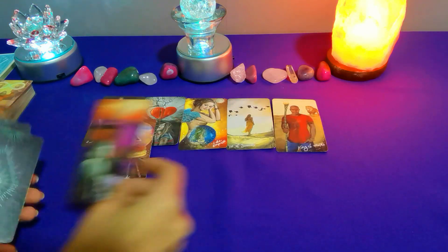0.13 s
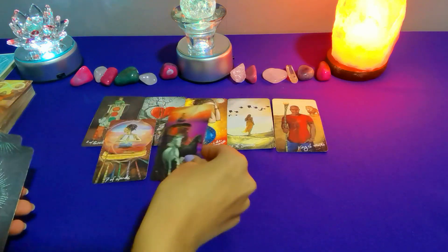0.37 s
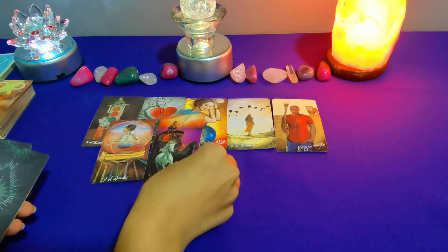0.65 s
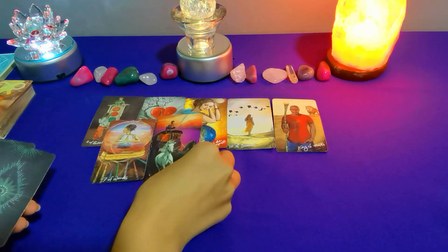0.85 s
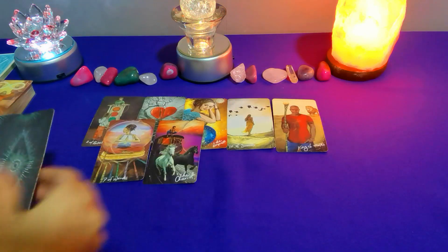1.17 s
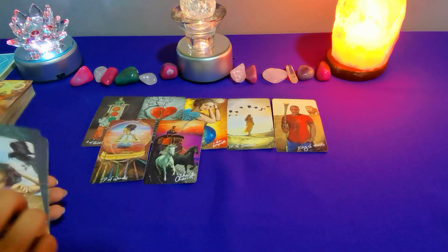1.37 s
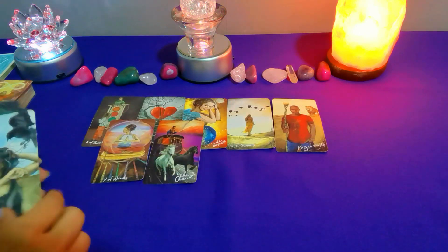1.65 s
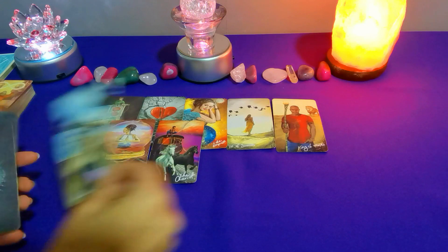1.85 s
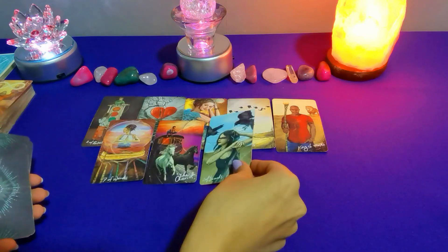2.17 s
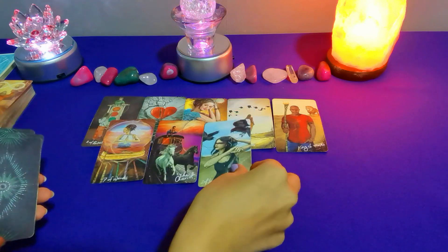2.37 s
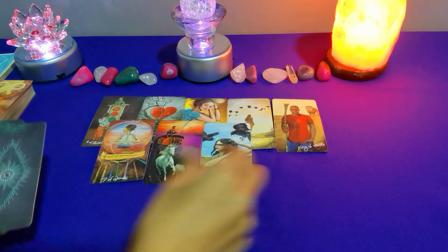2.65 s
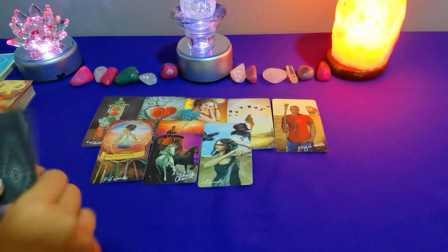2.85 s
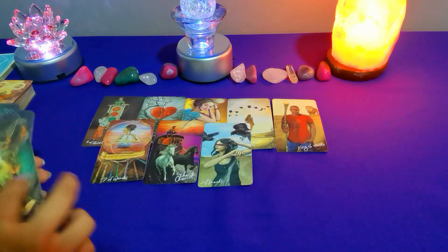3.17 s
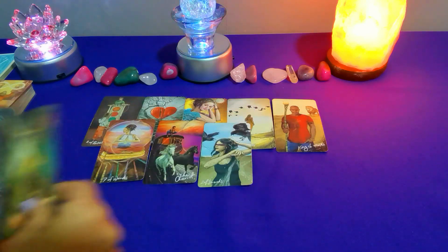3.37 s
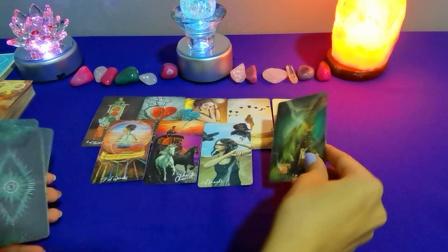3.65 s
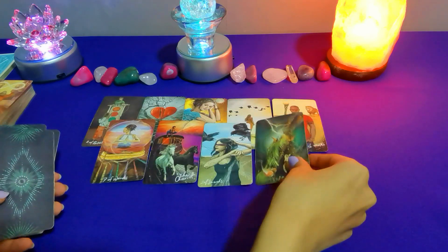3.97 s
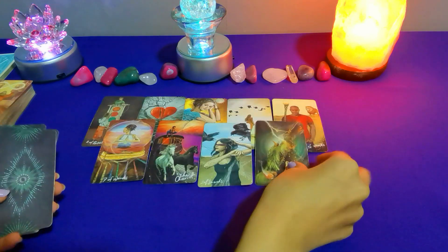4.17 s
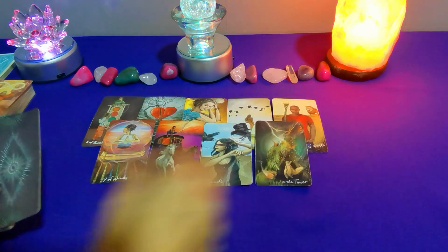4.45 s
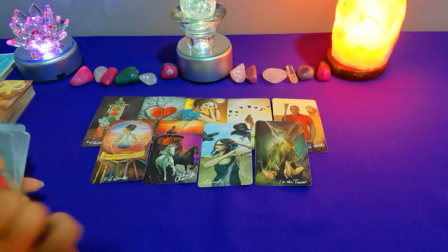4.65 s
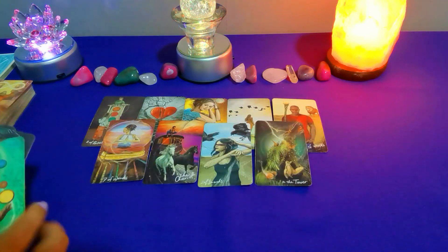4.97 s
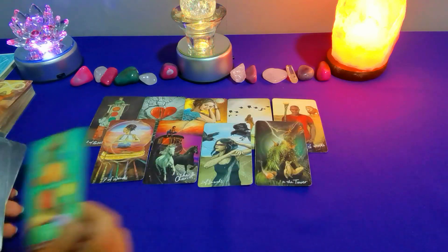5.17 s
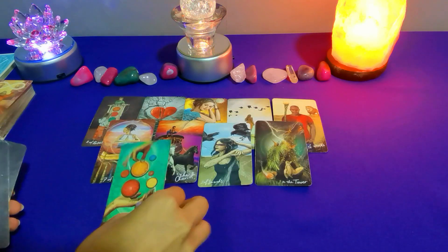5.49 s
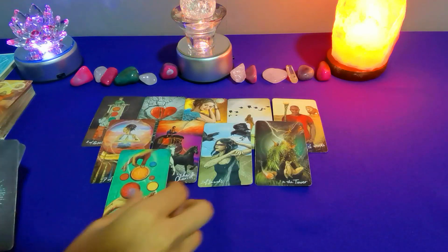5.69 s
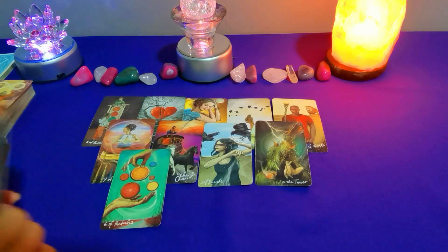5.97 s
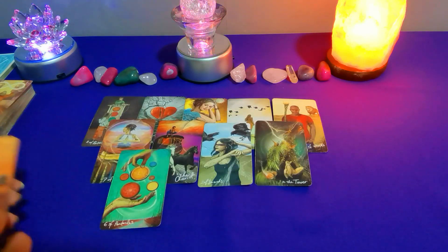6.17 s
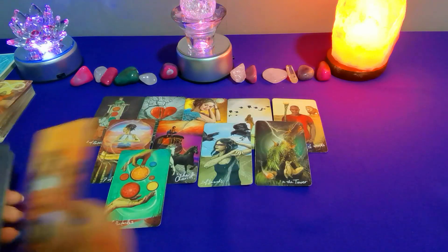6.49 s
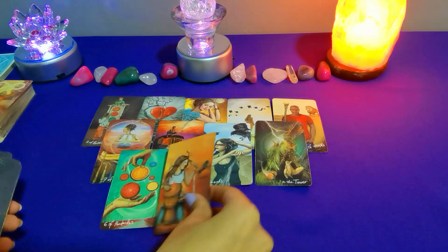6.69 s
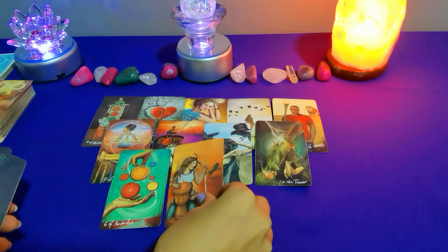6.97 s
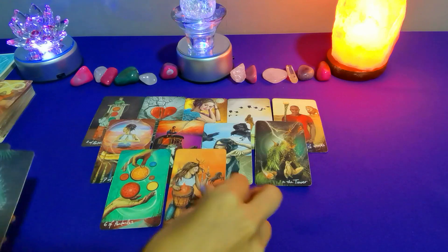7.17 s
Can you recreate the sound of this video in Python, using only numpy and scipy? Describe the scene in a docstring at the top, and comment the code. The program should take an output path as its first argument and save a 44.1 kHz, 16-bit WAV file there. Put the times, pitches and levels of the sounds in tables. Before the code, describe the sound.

Close handling of stiff cards in a small, quiet room with low house rumble and faint hiss. A card slides off the deck immediately with a thin swish and small clicks, lands with a faint scrape near 0.45 s, and soft dull knuckle bumps follow at 0.7-0.95 s. Cloth brushes, then sharp snaps and scuffs crackle from 1.2 to 1.5 s; the next card swishes free near 1.8 s and is laid quietly around 2.5 s. More flicks at 2.9-3.1 s, a swish at 3.35 s, a soft thud at 3.46 s, and a tick and scrape near 4.05 s. Rasping snaps at 4.6-4.8 s lead to a draw at 5.1 s and a strong snap at 5.56 s. A flurry at 5.9-6.2 s precedes the last swish at 6.4 s, a clearer scrape at 7.07 s and a final cloth brush. The treble is bright and ringing; the hardest snaps distort slightly.

```python
"""Large stiff cards are dealt one by one onto a cloth-covered table, close to a phone in a small quiet room.
For each card a thumb scuffs the deck and edges flick free, the card is drawn out with a swish, laid and pressed
down, and the hand brushes back over the cloth. Friction sounds are shaped noise, snaps are short noise bursts,
bumps are decaying table modes. The microphone rings in the treble and overloads on the hardest snaps."""
import sys
import numpy as np
from scipy import signal
from scipy.fft import rfft, irfft
from scipy.io import wavfile
from scipy.ndimage import uniform_filter1d

SR = 44100
rng = np.random.default_rng(int(sys.argv[2]) if len(sys.argv) > 2 else 0)


def transcribe(signal):
    """Save signal, clipped to [-1, 1], as a 16-bit WAV file at the path in sys.argv[1]."""
    frames = np.atleast_2d(signal).T
    limited = np.clip(frames, -1, 1)
    pcm = np.round(limited * 32767).astype(np.int16)
    wavfile.write(sys.argv[1], SR, pcm)


N = 323253
TIME = np.arange(N) / SR

# Bending resonances of a held card. Each row: centre in Hz, width in Hz, height over the broad spectrum in dB.
CARD_RINGS = [(560, 143, 8), (1116, 230, 4.5), (1370, 91, 2.5), (2010, 380, 4.5), (3150, 630, 2),
              (5730, 96, 3.5)]


def undb(db):
    """Decibels to gain."""
    return 10 ** (np.asarray(db) / 20)


def spectrum_db(points, hz):
    """Join (Hz, dB) points on a log-frequency axis."""
    point_hz, point_db = np.transpose(points)
    return np.interp(np.log(hz), np.log(point_hz), point_db)


def colour(x, points, rings=(), size=2048):
    """Minimum-phase filter of unit power gain with a broad spectrum and resonant humps."""
    hz = np.maximum(np.arange(size // 2 + 1) * SR / size, 1)
    db = spectrum_db(points, hz)
    for centre_hz, width_hz, hump_db in rings:
        db = db + hump_db / (1 + (2 * (hz - centre_hz) / width_hz) ** 2)
    # folding the cepstrum makes the response causal
    cepstrum = irfft(np.log(undb(db)))
    cepstrum[1:size // 2] *= 2
    cepstrum[size // 2 + 1:] = 0
    response = irfft(np.exp(rfft(cepstrum)))
    response /= np.linalg.norm(response)
    return signal.oaconvolve(x, response[None], axes=-1)[:, :N]


def walk(rate_hz):
    """Straight lines between Gaussian knots, rate_hz knots a second."""
    knots = rng.standard_normal(N)
    return np.interp(TIME * rate_hz, np.arange(N), knots)


def pan(db):
    """Left and right gains for a level difference; positive is left."""
    return undb(np.array([[db], [-db]]) / 2)


def noise(shared=0.22, lag_samples=9):
    """Noise at two microphone ports; the shared part reaches the left one first."""
    common = rng.standard_normal(N)
    both = np.array([common, np.roll(common, lag_samples)])
    return np.sqrt(shared) * both + np.sqrt(1 - shared) * rng.standard_normal((2, N))


def friction(grain_db, grain_hz, patchy_db, patch_hz, lag_samples=9):
    """Dense micro-slips: noise in tiny grains of uneven size that come in patches."""
    grip = undb(grain_db * walk(grain_hz) + patchy_db * walk(patch_hz))
    grip /= np.sqrt(np.mean(grip ** 2))
    return noise(lag_samples=lag_samples) * grip


def stroke(times_s, db):
    """Gain of one movement, silent before and after."""
    level_db = np.interp(TIME, times_s, db, left=-np.inf, right=-np.inf)
    return uniform_filter1d(undb(level_db), size=200)


def swell(s, db, rise_s, fall_s, hold_s=0):
    """Gain of a push that builds up exponentially to a moment, may be held, and dies away."""
    distance = np.maximum((s - TIME) / rise_s, (TIME - s - hold_s) / fall_s)
    return undb(db) * np.exp(-distance.clip(0, 20))


def around(s, half_s=.2):
    """The samples near a moment."""
    return slice(int((s - half_s) * SR), int((s + half_s) * SR))


def add(track, s, sound):
    """Mix a short stereo sound into a track."""
    start = int(np.clip(s * SR, 0, N - 1))
    track[:, start:start + sound.shape[-1]] += sound[..., :N - start]


def flexed(x, hump_db=5, width_share=0.32, count=5):
    """Every grip bends the card differently and gives it a few broad passing resonances."""
    notes_hz = 800 * 10 ** ((np.arange(count) + rng.random(count)) / count)  # one per slot, 800-8000 Hz
    rings = [(hz, width_share * hz, hump_db) for hz in notes_hz]
    return colour(x, [(1000, 0)], rings, size=1024)


def draws(edge_db=-2, body_db=-13, pan_db=4, note_width_hz=350, note_db=8):
    """A card slides off the deck: a thin hiss first, then the freed face radiates lower notes."""
    # Each row: start of creep in s, fastest pull in s, coming free in s, relative level in dB,
    # body on coming free in dB, note of the bent card in Hz.
    draw_rows = [(0, 0.064, 0.1, -33, 14, 1880), (1.66, 1.79, 1.855, -32.5, 7.5, 2820),
                 (3.257, 3.339, 3.384, -29.5, -0.5, 2300), (5.044, 5.081, 5.136, -26.5, 3, 1480),
                 (6.352, 6.425, 6.466, -30, 1.5, 2760)]
    # Spectra of hiss and face. Each row: frequency in Hz, relative level in dB.
    hiss_points = [(1000, -24), (2800, -13), (3900, -3), (6000, 2.5), (9000, 3), (14000, -2.5)]
    face_points = [(850, -11), (1450, 10), (2000, 12), (4200, 2.5), (8000, -5.5)]
    speed_up_s, release_s = 0.034, 0.035
    creep_db, slowing_db, touch_db = -13.5, -5, -22  # under the pull: slow start, coming free, first and last touch
    held_body_db = -23.5  # lower notes while the deck still holds the card

    slide = friction(grain_db=2.5, grain_hz=2000, patchy_db=3, patch_hz=170)
    edge, face = 0, 0
    for creep_s, pull_s, free_s, db, free_db, hz in draw_rows:
        times_s = [creep_s - release_s, creep_s, pull_s - speed_up_s, pull_s, free_s, free_s + release_s]
        course_db = np.array([touch_db, creep_db, creep_db, 0, slowing_db, touch_db])
        rub = slide * stroke(np.sort(times_s), db + course_db)
        freed = undb(np.interp(TIME, [pull_s, free_s], [held_body_db, free_db]))
        edge = edge + rub
        face = face + colour(rub * freed, face_points, [(hz, note_width_hz, note_db)])
    hiss = colour(edge, hiss_points, CARD_RINGS)
    return pan(pan_db) * (undb(edge_db) * hiss + undb(body_db) * face)


def brush(gain_db=-4, pan_db=4.0, attack_s=0.056, release_s=0.047, sleeve_db=-58):
    """Fine fibres under the moving hand and sleeve make a smooth, high hiss."""
    # Each row: time up to speed in s, time held in s, relative level in dB.
    stroke_rows = [(.42, 0.045, -47), (1.031, 0.081, -36.5), (1.19, 0.29, -40.5), (2.22, 0.16, -53.5),
                   (2.61, .5, -39), (3.45, 0.058, -45.5), (3.6, 0.11, -52), (3.98, 0.016, -52),
                   (4.14, 0.028, -42), (4.43, 0.41, -37.5), (5.36, 0.048, -42), (5.67, 0.54, -43.5),
                   (7.14, .01, -40), (7.3, .05, -31)]
    # Spectrum of rubbed cloth. Each row: frequency in Hz, relative level in dB.
    cloth_points = [(1200, -12), (3500, -12.5), (7300, 1.5), (10000, 4), (13000, -3)]
    strokes = [swell(s, db, attack_s, release_s, hold_s) for s, hold_s, db in stroke_rows]
    speed = np.maximum(np.max(strokes, axis=0), undb(sleeve_db))  # the arm is never quite still
    rub = speed * friction(grain_db=1.5, grain_hz=2500, patchy_db=1.5, patch_hz=46)
    return undb(gain_db) * pan(pan_db) * colour(rub, cloth_points)


def air(level_db=-52, waver_db=0.07):
    """Low steady rumble of the house and a faint hiss: coloured noise, barely wavering."""
    # Each row: frequency in Hz, relative level in dB.
    air_points = [(30, -30.5), (90, 4), (150, 3.5), (270, -1), (900, -19.5), (2200, -17.5), (4000, -21),
                  (6000, -17), (9000, -33.5), (15000, -18)]
    level = undb(level_db + waver_db * walk(5.22))
    return level * colour(noise(0.2, lag_samples=0), air_points)


def snaps(fall_s=0.00064, ring_s=0.0048, ring_db=-17, edge_db=-5, body_db=-17, pan_db=5, body_pan_db=2,
          mean_rebound_s=.008, rebound_db=-16):
    """An edge slips ever harder, lets go, and the stiff card flutters out in milliseconds and rebounds once."""
    # Card edges slapping their neighbours. Each row: release in s, relative level in dB, body over edge in dB,
    # swell time constant in s.
    snap_rows = [(.0454, -23.5, -6, 0.00098), (.1142, -17.5, -7, 0.0016), (.9376, -18.5, -6, 0.00061),
                 (.9574, -18, -21, 0.00062), (1.2467, -17.5, 6.5, 0.00087), (1.2977, -16, 13.5, 0.0017),
                 (1.3705, -9, 9, 0.0007), (1.4221, -0.5, -2, 0.00037), (1.4327, -15.5, 0, 0.0017),
                 (1.4756, -5, -4, 0.0016), (1.6197, -35, 3, 0.00051), (1.8215, -12, -12, 0.0011),
                 (1.8373, -15, -14, 0.0041), (1.9733, -30, -5, 0.00079), (2.128, -38, 3, .001),
                 (2.36, -37, 9, .0006), (2.4916, -28.5, -11, .0004), (2.8699, -17, 1, 0.00032),
                 (2.888, -17.5, -14, .0006), (2.9145, -10, 5.5, 0.00056), (3.0033, -8.5, 1, 0.00055),
                 (3.0411, -13, 0.5, 0.0004), (3.053, -12, 2, 0.00058), (3.0767, -2, -19, 0.0034),
                 (3.0848, -7, -3, 0.00021), (4.0524, -23, -13, .0015), (4.5813, -17.5, -1, 0.00084),
                 (4.599, -20.5, 4, 0.00068), (4.7189, -9.5, -2, 0.00057), (4.7742, -2.5, -4, 0.00068),
                 (4.8195, -4.5, -33, 0.0016), (5.134, -23, 7.5, .0015), (5.5126, -30, 17, 0.0014),
                 (5.5641, -2, -6, 0.0016), (5.8964, -22, 1.5, 0.0007), (5.9465, -29, 15, 0.0005),
                 (5.9996, -7.5, 7, 0.001), (6.0698, -10.5, 5, 0.00043), (6.0777, -18, 8, 0.0006),
                 (6.1214, -4, -3.5, 0.0011), (6.1628, -6, 3, 0.0011), (6.358, -22.5, -6, 0.00055),
                 (7.0712, -14.5, -7, 0.00042)]
    # Spectra of edge and body. Each row: frequency in Hz, relative level in dB.
    edge_points = [(1500, -22), (3200, -4), (6000, 3), (14000, 2.5)]
    body_points = [(80, -21), (280, 1), (800, -6), (2200, 1.5), (3500, 0.5), (8000, -6.5)]

    edge, body = np.zeros((2, 2, N))
    lead_s = .012
    t = np.arange(int(3 * lead_s * SR)) / SR - lead_s
    after = np.maximum(t, 0)
    flutter = np.exp(-after / fall_s) + undb(ring_db) * np.exp(-after / ring_s)
    slips = np.sign(noise(.6))  # equal force before shaping, only the direction is chance
    for k, (s, db, low_db, swell_s) in enumerate(snap_rows):
        shape = np.exp(np.minimum(t, 0) / max(swell_s, 1e-4)) * flutter
        shape /= np.sqrt(np.sum(shape ** 2) / SR / (2 * fall_s))  # same energy for every swell
        burst = shape * slips[:, k * len(t):(k + 1) * len(t)]
        flick = undb(db) * flexed(burst)
        rebound_s = mean_rebound_s * (.5 + rng.random())
        for late_s, sound in (0, flick), (rebound_s, undb(rebound_db) * flick):
            add(edge, s + late_s - lead_s, sound)
            add(body, s + late_s - lead_s, sound * undb(low_db))
    edge_sound = pan(pan_db) * undb(edge_db) * colour(edge, edge_points, CARD_RINGS)
    body_sound = pan(body_pan_db) * undb(body_db) * colour(body, body_points, CARD_RINGS)
    return edge_sound + body_sound


def lays(gain_db=1, pan_db=2, note_width_hz=420, note_db=10):
    """The dealt card's edge catches on the weave and the cards below; the card sings at its bending note."""
    # Each row: peak in s, relative level in dB, rise in s, fall in s, note of the bent card in Hz.
    lay_rows = [(.454, -49, 0.02, 0.019, 1850), (.95, -42, 0.028, 0.02, 2750),
                (1.055, -49, 0.037, 0.052, 2320), (2.495, -47.5, 0.023, 0.013, 3000),
                (4.053, -39.5, 0.0033, 0.01, 2850), (4.15, -48.5, 0.027, 0.026, 2460),
                (5.283, -48.5, 0.0036, 0.046, 2120), (5.40, -50, 0.026, 0.032, 2100),
                (5.518, -40, 0.009, 0.056, 1920), (6.813, -50, 0.03, 0.028, 2100),
                (7.065, -32, 0.02, .015, 2290)]
    # Spectrum of the scrape. Each row: frequency in Hz, relative level in dB.
    scrape_points = [(1000, -21), (1700, -2), (3200, 0), (6000, -1), (9000, 0), (14000, -24.5)]
    scrape = friction(grain_db=5.0, grain_hz=1500, patchy_db=0.5, patch_hz=130, lag_samples=0)
    track = np.zeros((2, N))
    for s, db, rise_s, fall_s, hz in lay_rows:
        span = around(s)
        glide = scrape[:, span] * swell(s, db, rise_s, fall_s)[span]
        add(track, span.start / SR, colour(glide, scrape_points, [(hz, note_width_hz, note_db)]))
    return undb(gain_db) * pan(pan_db) * track


def bumps(gain_db=-2, spread_log_hz=0.27, contact_s=0.0027, phase_spread_rad=0.84):
    """Knuckles and hand heel ring the padded table top; each bump stirs the modes around its own frequency."""
    # Each row: start in s, relative level in dB, centre of the stirred modes in Hz.
    bump_rows = [(.678, -45.5, 150), (0.795, -44, 223), (.829, -39, 233), (.846, -43, 234),
                 (0.892, -41.5, 218), (0.944, -43.5, 218), (3.457, -45, 120), (3.459, -34.5, 347),
                 (3.652, -44.5, 117)]
    # Modes of the table top. Each row: frequency in Hz, relative level in dB, T60 in s.
    table_modes = [(115.7, 10.5, 0.21), (149.2, 5, 0.36), (228.9, 2.5, 0.25), (265.7, 4.5, 0.2),
                   (364, 3, 0.079), (518, 4.5, 0.074)]
    thuds = np.zeros((2, N))
    t = TIME[:SR // 3]
    hz, mode_db, t60_s = np.transpose(table_modes)[:, :, None]
    for s, db, centre_hz in bump_rows:
        phase = rng.normal(0, phase_spread_rad, (2, len(table_modes), 1))
        share = undb(db + mode_db) * np.exp(-.5 * (np.log(hz / centre_hz) / spread_log_hz) ** 2)
        modes = share * np.sin(2 * np.pi * hz * t + phase) * undb(-60 * t / t60_s)
        soft_onset = 1 - np.exp(-(t / contact_s) ** 2)
        add(thuds, s, np.sum(modes, axis=1) * soft_onset)
    return undb(gain_db) * thuds


def scuffs(edge_db=-3, body_db=-15, pan_db=2.5, fall_ratio=1.43):
    """Cards pushed across each other under the thumb rasp; some pushes also shake the stack with a low clatter."""
    # Each row: peak in s, relative level in dB, body (how much of the stack is shaken) in dB, rise in s.
    scuff_rows = [(1.222, -28.5, 3.5, 0.0044), (1.265, -35.5, -4, 0.012), (1.303, -20.5, 4.5, 0.015),
                  (1.439, -29, 0.5, 0.017), (2.885, -26, 1, 0.03), (2.918, -18, -8, 0.0045),
                  (3.073, -21.5, -8.5, 0.02), (4.642, -16.5, -1, 0.013), (4.664, -25, 10, 0.0062),
                  (4.728, -18, -4, 0.0051), (4.817, -24, -3.5, 0.017), (5.554, -26.5, -2, 0.0061),
                  (5.982, -26, -4, 0.021), (6.006, -27.5, 8.5, 0.0057), (6.157, -37, -8, 0.09)]
    # Spectra of rasping faces and shaken stack. Each row: frequency in Hz, relative level in dB.
    rasp_points = [(1000, -17.5), (3800, -7), (6000, 6), (14000, 3)]
    stack_points = [(70, -10), (260, 12.5), (750, -5), (1100, -3.5), (2200, -3.5), (6000, -11)]
    rasp = friction(grain_db=4.5, grain_hz=1600, patchy_db=3.5, patch_hz=250)
    edge, body = np.zeros((2, 2, N))
    for s, db, low_db, rise_s in scuff_rows:
        span = around(s)
        push = flexed(rasp[:, span] * swell(s, db, rise_s, fall_ratio * rise_s)[span])
        add(edge, span.start / SR, push)
        add(body, span.start / SR, push * undb(low_db))
    faces = undb(edge_db) * colour(edge, rasp_points, CARD_RINGS)
    stack = undb(body_db) * colour(body, stack_points, CARD_RINGS)
    return pan(pan_db) * (faces + stack)


def room(x, wet_db=-9, gap_s=0.0023, split_hz=2500, low_t60_s=0.22, high_t60_s=0.19):
    """Near walls answer within milliseconds with a noise tail; the treble dies first."""
    wall_points = [(200, 6.5), (1500, 3.5), (3500, 9.5), (6000, 1.5), (9000, -1.0), (14000, -1.0)]  # (Hz, dB)
    t = TIME[:SR // 3]
    low_pass = signal.butter(2, split_hz, fs=SR, output="sos")
    high_pass = signal.butter(2, split_hz, "high", fs=SR, output="sos")
    low = signal.sosfilt(low_pass, rng.standard_normal((2, len(t))))
    high = signal.sosfilt(high_pass, rng.standard_normal((2, len(t))))
    tail = low * undb(-60 * t / low_t60_s) + high * undb(-60 * t / high_t60_s)
    tail *= np.clip(t / gap_s - .5, 0, 1)  # fades in around the gap
    tail /= np.linalg.norm(tail, axis=1, keepdims=True)
    echoes = signal.oaconvolve(x, tail, axes=-1)[:, :N]
    return x + undb(wet_db) * colour(echoes, wall_points)


def scene():
    """All the handling sounds in the room, over its quiet air."""
    handling = snaps() + scuffs() + draws() + lays() + brush() + bumps()
    return room(handling) + air()


def record(dry, gain_db=3.5, top_hz=15900):
    """The microphone port rings near 9 kHz, the loudest snaps clip, and the top is cut."""
    # Microphone response. Each row: frequency in Hz, relative level in dB.
    mic_points = [(4000, 1), (6000, 3), (7300, 6), (8150, 12), (8750, 16.5), (9400, 8), (10500, -0.5),
                  (11800, -12), (15500, -24)]
    clipped = np.clip(undb(gain_db) * colour(dry, mic_points), -1, 1)
    top_cut = signal.ellip(8, .2, 70, top_hz, fs=SR, output="sos")
    return signal.sosfilt(top_cut, clipped)


dry = scene()
out = record(dry)
transcribe(out)
```